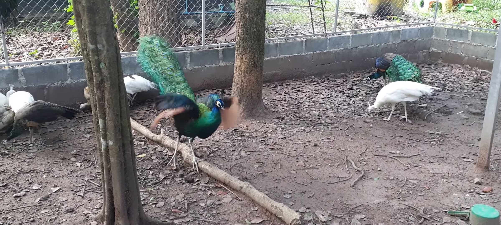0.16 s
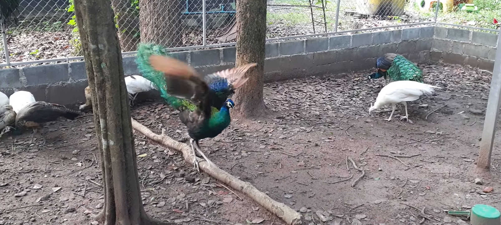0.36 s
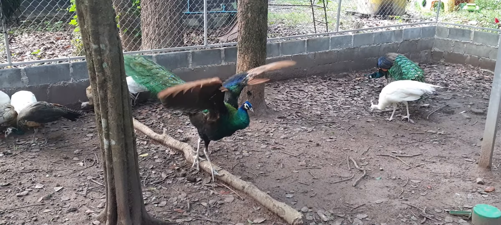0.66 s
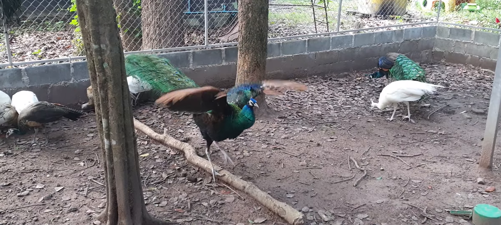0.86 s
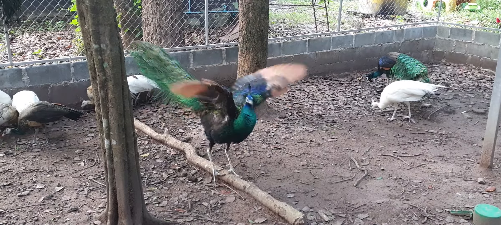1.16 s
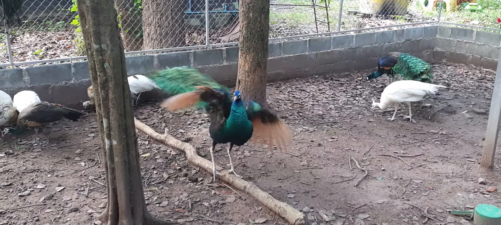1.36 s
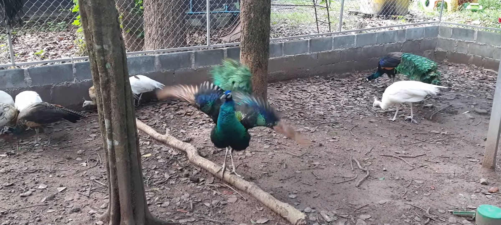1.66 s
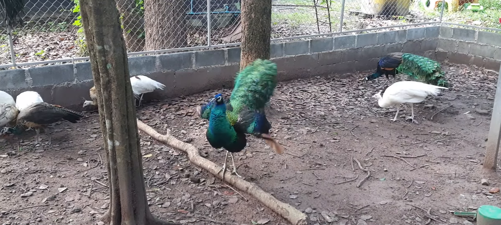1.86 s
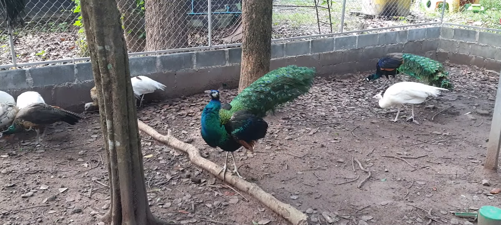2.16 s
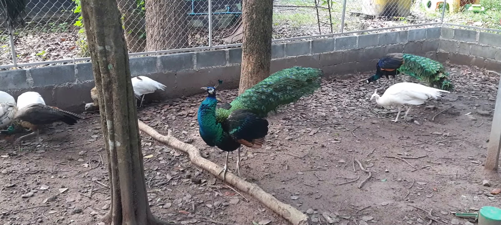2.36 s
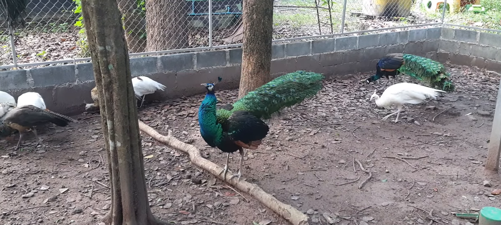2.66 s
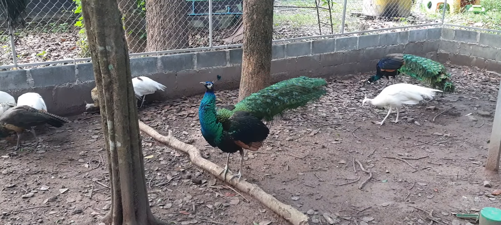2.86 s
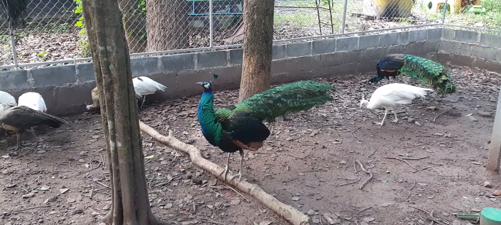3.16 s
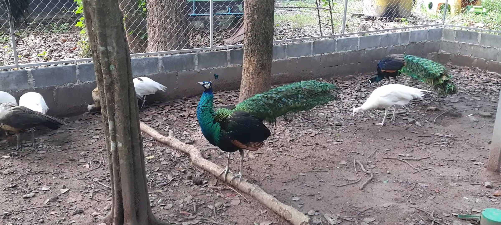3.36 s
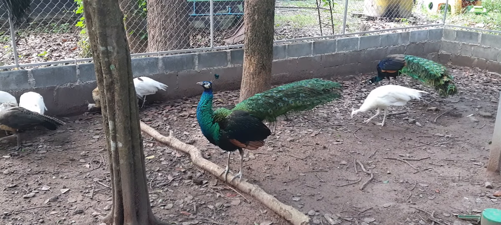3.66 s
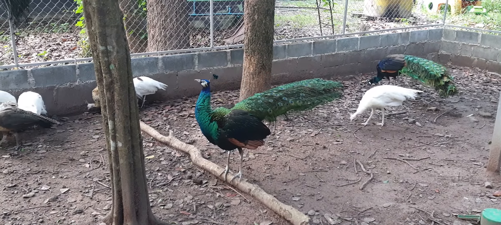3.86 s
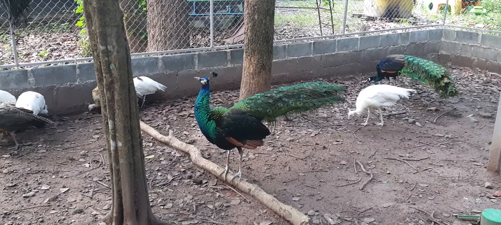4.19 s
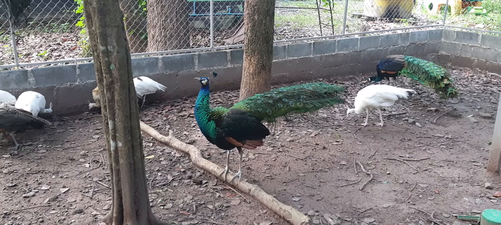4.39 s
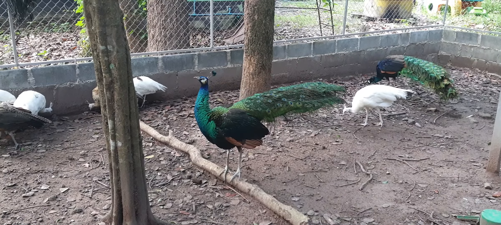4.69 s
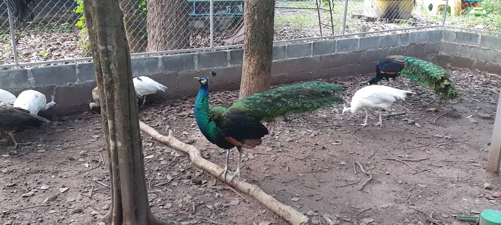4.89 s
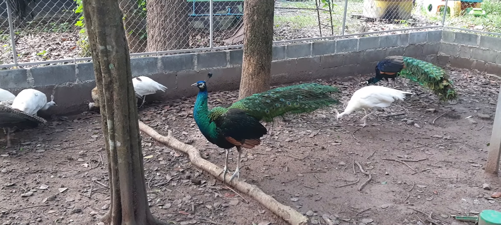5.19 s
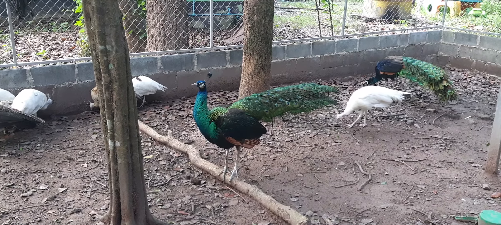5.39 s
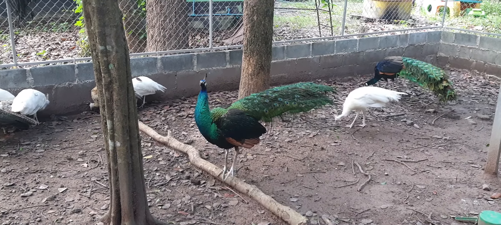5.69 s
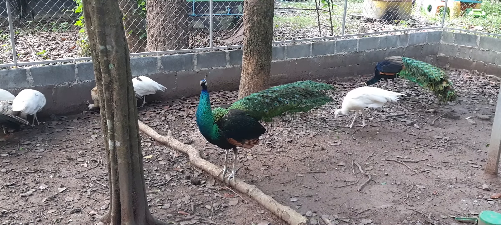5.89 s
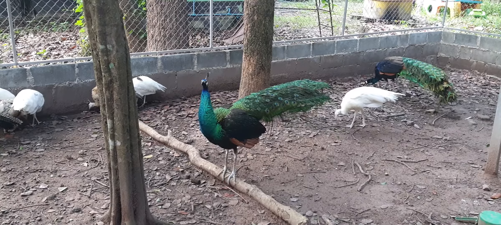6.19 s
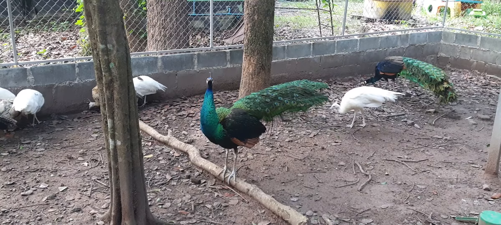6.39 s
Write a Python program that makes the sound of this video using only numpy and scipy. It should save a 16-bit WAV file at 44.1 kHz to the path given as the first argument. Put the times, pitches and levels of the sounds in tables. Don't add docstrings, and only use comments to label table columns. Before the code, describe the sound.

First a sharp twig crack, soft wingbeats and a low left-leaning engine that suddenly stops. Then a calmer pen: faint leaf rustle, small snaps, thin whistles, harsh little buzzes ending in chips, distant clucks and crowing, crickets and air hiss over faraway motors. Finally a rough, rising three-part crow erupts nearby, much louder than everything else. Phone pickup, wide outdoor ambience with short scattered echoes.

```python
import sys
import numpy as np
from scipy import signal
from scipy.fft import rfft, irfft, next_fast_len
from scipy.io import wavfile
from scipy.ndimage import uniform_filter1d

SR = 44100
rng = np.random.default_rng(int(sys.argv[2]) if len(sys.argv) > 2 else 0)


def linear_from_db(decibels):
    return 10 ** (np.asarray(decibels, float) / 20)


def bounce(signal):
    frames = np.transpose(np.atleast_2d(signal))
    limited = np.clip(frames, -1, 1)
    pcm = np.round(limited * 32767).astype(np.int16)
    wavfile.write(sys.argv[1], SR, pcm)


N = 288414
PORT_GAP = 13


def evened(x):
    return x / np.sqrt(np.mean(x ** 2) + 1e-20)


def read(points, hz):
    f, value = np.transpose(points)
    return np.interp(np.log(hz + 1), np.log(f + 1), value)


def curves(rows):
    s, *columns = np.transpose(rows)
    t = np.arange(s[0], s[-1], 1 / SR)
    return s[0], [np.interp(t, s, column) for column in columns]


def whole(rows):
    s, *columns = np.transpose(rows)
    return [np.interp(np.arange(N) / SR, s, column) for column in columns]


def add(mix, s, sound):
    part = mix[..., max(round(s * SR), 0):][..., :sound.shape[-1]]
    part += sound[..., :part.shape[-1]]


def wander(count, hz):
    smoother = np.poly([np.exp(-2 * np.pi * hz / SR)] * 2)
    return evened(signal.lfilter([1], smoother, rng.standard_normal(count + 8000))[8000:])


def colour(x, points):
    size = next_fast_len(x.shape[-1] + 2048)
    gain = linear_from_db(read(points, np.fft.rfftfreq(size, 1 / SR)))
    return irfft(rfft(x, size) * gain, size)[..., :x.shape[-1]]


def sine(hz):
    return np.sin(2 * np.pi * np.cumsum(hz) / SR)


def fuzzy(hz, width):
    turn = 2 * np.pi * np.cumsum(hz) / SR
    return evened(wander(len(hz), width / 2) * np.cos(turn) + wander(len(hz), width / 2) * np.sin(turn))


def wash(points, patchy_db, size):
    # pitch_hz, likeness (0-1)
    likeness = [(60, 0.94), (200, 0.86), (500, 0.72), (1500, 0.082), (4000, 0.028), (15000, 0.041)]
    frames, hz = 4 * N // size + 5, np.fft.rfftfreq(size, 1 / SR)
    a, b, c, d, patches = rng.standard_normal((frames, len(hz), 5)).T
    patches = evened(uniform_filter1d(uniform_filter1d(patches, size=12, axis=0), size=10, axis=1))
    same = np.clip(read(likeness, hz), 0, 1)[:, None]
    right = a + 1j * b
    early = np.exp(2j * np.pi * hz * PORT_GAP / SR)[:, None]
    left = same * right * early + np.sqrt(1 - same ** 2) * (c + 1j * d)
    z = np.array([left, right]) * linear_from_db(read(points, hz)[:, None] + patchy_db * patches)
    return evened(signal.istft(z, nperseg=size, noverlap=3 * size // 4)[1][:, :N])


def pen(x, wet_db, t60):
    count = SR // 3
    taps = np.zeros((2, count))
    at = np.arange(200, count - 20, 20) + rng.integers(0, 20, (2, (count - 201) // 20))
    np.put_along_axis(taps, at, rng.choice([-1., 1.], at.shape), 1)
    taps *= linear_from_db(-60 * np.arange(count) / SR / t60)
    taps *= linear_from_db(wet_db) / np.linalg.norm(taps[0])
    taps[[0, 1], [0, PORT_GAP]] = 1
    return signal.oaconvolve(x * np.ones((2, 1)), taps, axes=1)[:, :N] / np.hypot(1, linear_from_db(wet_db))


def swells(rows):
    t, power = np.arange(N) / SR, 0
    for s, db, rise, fall in rows:
        power = power + linear_from_db(db - 20 * np.maximum((s - t) / rise, (t - s) / fall)) ** 2
    return np.sqrt(power)


def surges(rows, dip_db):
    s = np.transpose(rows)[0]
    hz, db = whole(rows)
    place = np.interp(np.arange(N) / SR, s, np.arange(len(s)))
    return hz, db - dip_db * np.sin(np.pi * place) ** 2


def crow():
    # time_s, effort_db, pitch_hz
    syllables = [
        [(5.845, -62, 808), (5.88, -47.5, 770.3), (5.93, -40.5, 769.6), (6.0, -45.5, 775.4), (6.05, -50, 775.6),
         (6.1, -56, 795.5), (6.17, -54, 759)],
        [(6.155, -68, 790.5), (6.195, -45.5, 853.5), (6.225, -36.5, 873), (6.26, -38, 873.3), (6.3, -37, 886.6),
         (6.34, -40, 890), (6.4, -41.5, 880)],
        [(6.39, -46, 850), (6.43, -38, 843), (6.465, -34, 866), (6.5, -39.5, 840), (6.54, -32, 840)],
    ]
    # centre_hz, width_hz, level_db
    beaks = [
        [(610, 105, -11), (1133, 245, -1), (1424, 186, 3.5), (1890, 99, -5), (2330, 200, -10.5),
         (2720, 280, -8.5), (3180, 127, -12), (4200, 160, -16)],
        [(685, 130, -35), (840, 400, -3.5), (1120, 233, -10), (1440, 390, 2), (1750, 160, 4.5),
         (2140, 220, 6.5), (2700, 90, -4), (2840, 230, -5), (3080, 270, -16), (3630, 170, -4),
         (4760, 320, -12.5)],
        [(691, 61, -10), (840, 340, -3.5), (1120, 153, -6), (1520, 330, 1.5), (1690, 160, 4), (2070, 210, 4),
         (2250, 170, -6), (2740, 190, -8), (2900, 190, -1), (3100, 150, -8), (4760, 470, -14)],
    ]
    # pitch_hz, level_db
    throat = [(400, -31), (560, -35), (1500, -10.5), (3200, -18.5), (3600, -13.5), (6000, -28), (9000, -42),
              (15000, -60)]
    # second_membrane_hz, hoarseness at start and at end (0-1), chest_start_db, chest_settled_db
    membranes = [
        (680, .4, .62, -21, 4),
        (685, .22, .5, -5, -1),
        (688, .48, .6, 2, 1),
    ]
    out, grid = np.zeros(N), np.arange(300, 16000, 10.)
    for rows, beak, (second_hz, fresh, tired, early_db, late_db) in zip(syllables, beaks, membranes):
        s, (effort_db, hz) = curves(rows)
        count = len(hz)
        t = np.arange(count) / SR
        hoarse = np.clip(np.linspace(fresh, tired, count), 0, 1)
        chest_db = late_db + (early_db - late_db) * np.exp(-(t / .08) ** 2)
        first = 2 * np.pi * np.cumsum(hz * (1 + .024 * wander(count, 45))) / SR
        second = 2 * np.pi * np.cumsum(second_hz * (1 + .027 * wander(count, 58.5))) / SR
        harmonics = sum(np.cos(k * first) for k in range(1, 14))
        pulses = harmonics * (1 + 1.05 * np.cos(second)) + 1.32 * np.cos(second)
        breath = (1 + np.cos(first)) * rng.standard_normal(count)
        drive = (1 - hoarse) * evened(pulses) + hoarse * evened(breath)
        drive = drive * linear_from_db(3.0 * wander(count, 55))

        def through_beak(opening):
            gain = linear_from_db(read(throat, grid))
            for f, width, db in beak:
                gain = gain + linear_from_db(db) / (1 + abs(2 * (grid - opening * f) / width) ** 3)
            return colour(drive, np.c_[grid, 20 * np.log10(gain)])

        shut, ajar = through_beak(.94), through_beak(1)
        closing = np.clip(np.exp(-(t / .04) ** 2) + .3 * (wander(count, 12) - .6), 0, 1)
        voice = np.sqrt(closing) * shut + np.sqrt(1 - closing) * ajar
        chest = colour(voice, [(950, 0), (1050, -60)])
        add(out, s, linear_from_db(effort_db) * evened(voice + (linear_from_db(chest_db) - 1) * chest))
    return linear_from_db(7.0) * pen(out, wet_db=-4, t60=0.33)


def scold():
    # start_s, length_s, buzz_db, upper_resonance_db
    buzzes = [
        (0, 0.12, -61, -67),
        (0.327, 0.23, -58.5, -88),
        (1.417, 0.37, -59, -59),
        (2.799, 0.21, -62, -96),
        (4.335, .19, -61.5, -102),
        (5.163, 0.42, -58, -55),
    ]
    # start_s, peak_db, pitch_hz
    chips = [(.365, -49, 3430), (0.418, -42.5, 3240), (1.66, -42.5, 3280), (2.83, -46, 3420),
             (2.885, -42, 3320), (4.367, -50, 3327), (4.419, -43.5, 3300), (5.389, -42.5, 3277)]
    out = np.zeros(N)
    for s, length, buzz_db, upper_db in buzzes:
        t = np.arange(0, length, 1 / SR)
        flat = np.ones(len(t))
        rise_db = -10 * np.maximum(1 - t / .034, 0)
        low_db = buzz_db + rise_db - 9.5 * (t / length) ** 2
        high_db = upper_db + rise_db - 9.5 * np.maximum(1 - t / .15, 0)
        high_db = high_db - 102 * np.maximum(t - .091, 0)
        buzz = 1 + .6 * np.cos(2 * np.pi * np.cumsum(180 * (1 + .1 * wander(len(t), 30))) / SR)
        sag = 5080 - 650 * (t / length) ** 2
        low = fuzzy(sag, 550) + 0.91 * fuzzy(sag + 450 - 1400 * t / length, 1400)
        high = fuzzy(7150 * flat, 720) + 1.6 * fuzzy(6500 * flat, 700)
        bands = linear_from_db(low_db) * low + linear_from_db(high_db) * high
        add(out, s, bands * buzz * signal.windows.tukey(len(t), .15))
    u = np.linspace(0, 1, round(0.0332 * SR))
    for s, db, hz in chips:
        chip = sine(hz * (1 + .16 * (1 - u) ** 2)) + .7 * fuzzy(1.12 * hz + 0 * u, 700)
        add(out, s, linear_from_db(db - 6.0) * chip * np.sin(np.pi * u))
    return linear_from_db(3) * pen(out, wet_db=-4, t60=.15)


def whistles():
    # time_s, level_db, pitch_hz
    songs = [
        [(1.31, -71, 2300), (1.36, -75, 2250), (1.402, -70, 2350), (1.43, -65.5, 2260), (1.46, -66.5, 2080),
         (1.528, -63, 1925), (1.575, -61, 1852), (1.6, -59, 1863), (1.614, -78, 1875), (1.635, -58, 1867),
         (1.7, -77, 1980)],
        [(3.57, -78, 2720), (3.62, -72, 2870), (3.75, -71.5, 3020), (3.83, -71, 2960), (3.92, -75, 2913)],
        [(4.04, -75, 2860), (4.09, -83, 2360), (4.15, -65.5, 2136), (4.2, -71, 2082), (4.34, -72.5, 1840)],
        [(3.6, -80, 3790), (3.66, -63, 3920), (3.74, -68, 3800)],
        [(1.285, -72, 2080), (1.3, -64, 1845), (1.32, -66, 1750), (1.345, -72, 1710)],
    ]
    purity = [1.1, .7, .5, .6, .9]
    # start_s, first_pitch_hz, level_db, left_minus_right_db
    cheeps = [(3.9, 3420, -70, -6), (3.91, 2010, -74, -2), (4.034, 2900, -73, -6), (3.96, 2032, -71, -9),
              (4.268, 2194, -69, -1), (4.373, 2114, -66.5, -15), (4.426, 2300, -65.5, -17),
              (4.698, 2630, -71.5, -6), (4.78, 2463, -65.5, -6)]
    # start_s, length_s, first_pitch_hz, level_db, left_minus_right_db
    level_notes = [(0, 0.2, 2650, -76, -2), (0.597, 0.03, 3010, -74, -5), (2.628, 0.1, 3264, -75, -11),
                   (3.171, .08, 2250, -76.5, -1), (4.049, .07, 7710, -81, -1),
                   (1.156, 0.12, 2630, -68.5, 8), (1.233, .1, 2940, -70.5, 0),
                   (3.992, 0.057, 3257, -68.5, -4), (4.201, 0.066, 1365, -71, -8),
                   (4.706, 0.22, 2450, -68.5, 8), (4.718, 0.033, 1830, -67, 2), (4.969, 0.12, 780, -75, -4),
                   (4.98, 0.36, 2200, -73.5, -3), (5.123, 0.15, 2480, -74, 0), (5.164, 0.052, 2290, -66, 3),
                   (3.59, 0.31, 1750, -78.5, 6), (3.68, 0.16, 2610, -81, -6)]
    out = np.zeros((2, N))

    def tone(hz, clean, width):
        return clean * sine(hz) + (1 - .7 * clean) * fuzzy(hz, width)

    calls = [(s, .035, hz, db, pan_db, .84, .95) for s, hz, db, pan_db in cheeps]
    calls += [tuple(row) + (.93, .6) for row in level_notes]
    for s, length, first_hz, db, pan_db, fall, clean in calls:
        hz = first_hz * np.linspace(1, fall, round(length * SR))
        ports = linear_from_db([[db + pan_db], [db]])
        add(out, s, ports * tone(hz, clean, 230) * signal.windows.tukey(len(hz), .5))
    for rows, clean in zip(songs, purity):
        s, (db, hz) = curves(rows)
        add(out, s, linear_from_db([db, db]) * tone(hz, clean, 200) * signal.windows.tukey(len(hz), .1))
    return linear_from_db(9.0) * pen(out, wet_db=-7, t60=.19)


def rustle():
    # peak_s, level_db, rise_s, fall_s (times for 20 dB)
    stirs = [(.15, -51.5, 0.0043, 0.027), (.165, -61, 0.049, 0.17), (.22, -68, .05, 0.12),
             (.27, -75, 0.23, 0.85), (.66, -69.5, 1, 0.34), (1.18, -68.5, 0.25, 1),
             (1.62, -63.5, 0.16, 0.34), (1.82, -72.5, 0.55, 0.18), (3.1, -70, 0.1, 0.21),
             (4.7, -75, 0.41, 0.32), (4.83, -63, 0.066, 0.16), (5.26, -68, 0.22, 0.14),
             (5.52, -73.5, 0.061, 0.12), (5.96, -65.5, 0.28, 0.3), (6.2, -68, .06, 0.74),
             (6.54, -61, 0.15, 0.077)]
    # pitch_hz, level_db (per Hz)
    leaf_tint = [(2500, -2.5), (4000, 6.5), (5500, 3.5), (7500, -2.5), (9300, -5), (10300, -12.5),
                 (11500, -7), (13000, -2.5), (15500, -8)]
    # peak_s, level_db, rise_s, fall_s (times for 20 dB)
    flaps = [
        (0, -76, 0.39, 3.7),
        (1.25, -68.5, 0.2, 1.25),
        (1.6, -68, 0.96, 0.26),
        (3.0, -81, 1, 1.4),
        (3.9, -71, 0.16, 1.94),
        (5.0, -68.5, 0.95, 1.51),
    ]
    clicks = linear_from_db(0.7 * np.minimum(rng.exponential(1, N), 5))
    crackle = clicks * (rng.random(N) < 900 / SR) * rng.choice([-1, 1], N)
    grains = evened(colour(pen(crackle, wet_db=49.0, t60=0.022), leaf_tint))
    litter = evened(wash(leaf_tint, patchy_db=3.0, size=256) + 0.7 * grains)
    leaves = linear_from_db(11.5) * np.hypot(swells(stirs), linear_from_db(-84)) * litter
    feather_tint = [(700, -32), (1500, -2.5), (2300, -2.5), (3200, -6.0), (3450, 5.0), (6000, -47)]
    return leaves + linear_from_db(7.0) * swells(flaps) * wash(feather_tint, patchy_db=3.0, size=512)


def wingbeats():
    # start_s, length_s, level_db
    puffs = [
        (0.139, 0.076, -59.5),
        (0.259, 0.11, -73),
        (0.429, 0.21, -60.5),
        (0.618, 0.19, -70),
    ]
    out = np.zeros(N)
    for s, length, db in puffs:
        noise = rng.standard_normal(round(length * SR))
        puff = colour(noise, [(150, -39), (230, 1), (400, -1.5), (650, -41), (1200, -46)])
        add(out, s, linear_from_db(db) * evened(puff) * np.hanning(len(puff)))
    return out


def snaps():
    # start_s, peak_db, knock_db
    twig = [
        (.143, -40, -44),
        (.1457, -28, -32),
        (.1488, -29, -34),
    ]
    # start_s, peak_db, knock_db
    pecks = [(0.5037, -49.5, -52), (0.967, -45.5, -105), (1.062, -54, -80), (1.1172, -47, -49.5),
             (1.429, -50, -53), (1.5873, -54, -61), (2.18, -63, -56), (2.83, -61, -55), (3.102, -65, -50.5),
             (3.9058, -77, -49.5), (3.9463, -62, -52), (4.039, -60, -52), (4.814, -45, -52),
             (4.9785, -52.5, -86), (5.5103, -54, -62)]
    out, t = np.zeros(N), np.arange(round(.1 * SR)) / SR
    shape = (np.exp(-t / 0.00086) + 0.029 * np.exp(-t / 0.055)) * (1 - np.exp(-t / 0.00045))
    for s, db, low_db in list(twig) + list(pecks):
        crack, knock = rng.standard_normal((2, len(t))) * shape
        crack = colour(crack, [(3000, -10.0), (5000, -4.5), (7500, 0.5), (10500, -7.0), (13000, 0.5), (16000, -3.0)])
        knock = colour(knock, [(200, 5.0), (1000, -34.0), (2600, 12.5), (3200, 13.5), (3800, -9.0)])
        add(out, s, linear_from_db(db + 9) * crack / abs(crack).max())
        add(out, s, linear_from_db(low_db + 3.0) * knock / abs(knock).max())
    return pen(out, wet_db=-1, t60=.2)


def far_calls():
    # start_s, length_s, level_db, drift_db, first_pitch_hz, last_pitch_hz
    cocks = [(.79, .75, -72.5, 4, 1670, 1560), (1.5, .6, -71.5, 0.5, 1520, 1410),
             (2.06, .6, -70.5, -4.5, 1430, 1560), (.8, .5, -72.5, -4, 2130, 1940),
             (1.62, .9, -79, 5, 1900, 1830), (1.7, .8, -80, -3.5, 1160, 1110)]
    # start_s, length_s, level_db, drift_db, first_pitch_hz, last_pitch_hz
    goose = [
        (.9, 0.59, -69.5, -4.5, 795, 785),
        (1.38, 0.412, -65, -14, 785, 750),
        (1.27, 0.513, -69, -6, 660, 680),
    ]
    # start_s, length_s, level_db, pitch_hz
    hen = [(0, 0.075, -61, 1102), (0.117, 0.19, -62, 1098), (0.325, 0.17, -76.5, 1046),
           (2.643, 0.11, -59, 1144), (2.774, 0.094, -64.5, 1053), (2.864, 0.1076, -64.5, 1082),
           (2.997, 0.14, -61.5, 1121), (3.149, 0.053, -67.5, 1117), (3.221, 0.096, -78.5, 1153)]
    out = np.zeros(N)
    clucks = [(s, length, db, -4.5, hz, hz - 75.2) for s, length, db, hz in hen]
    lows = [(s - .018, length, db - 6, -6, 890, 890) for s, length, db, hz in hen]
    # rows, ratio of second line, its share, width in Hz, edge, pure tone, throb
    kinds = [(cocks, .93, .7, 110, .15, .25, 0), (goose, .9, .9, 70, .35, .3, 0),
             (clucks, 1.04, .4, 55, .2, 1.7, .6), (lows, 1.07, .6, 50, .2, .7, .6)]
    for rows, ratio, share, width, edge, clean, throb in kinds:
        for s, length, db, drift_db, first_hz, last_hz in rows:
            u = np.linspace(0, 1, round(length * SR))
            hz = first_hz + (last_hz - first_hz) * u ** .7
            pair = clean * sine(hz) + fuzzy(hz, width) + share * fuzzy(ratio * hz, 3.5 * width)
            pair = pair * (1 - throb * np.cos(2 * np.pi * 29 * length * u))
            add(out, s, linear_from_db(db + drift_db * u) * evened(pair) * signal.windows.tukey(len(u), edge))
    return linear_from_db(6.0) * pen(out, wet_db=-2, t60=.3)


def crickets():
    # first_s, last_s, level_db
    bouts = [(.03, .04, -63), (.2, .4, -65), (.55, .75, -61.5), (.91, 1.5, -67), (1.73, 2.35, -62.5),
             (2.44, 3.1, -68.5), (3.15, 4.7, -62), (5.45, 6.45, -64.5)]
    out, t = np.zeros(N), np.arange(round(.095 * SR)) / SR
    for first_s, last_s, db in bouts:
        for s in np.arange(first_s, last_s, .1785):
            trill = .85 * np.sin(2 * np.pi * 4850 * t) + .7 * fuzzy(4845 + 0 * t, 90)
            trill = trill * (1 + .45 * np.cos(2 * np.pi * 135 * t))
            add(out, s, linear_from_db(db) * trill * signal.windows.tukey(len(t), .4))
    swell_db = 2 * wander(N, 4)
    chorus = np.array([linear_from_db(-73.5 + swell_db) * fuzzy(np.full(N, 5950.), 450) +
                       linear_from_db(-89.0 - swell_db / 2) * fuzzy(np.full(N, 4400.), 380) for port in range(2)])
    return pen(out, wet_db=-5, t60=.14) + colour(chorus, [(3900, -30), (4150, 0)])


def stalling_engine():
    # time_s, firing_hz, level_db
    firing = [(-.06, 79, -25), (.06, 79.6, -42.5), (.195, 81.3, -42), (.335, 81.6, -39.5), (.43, 80, -38.5),
              (.562, 79, -40), (.648, 77.8, -42.5), (.735, 82, -43.5), (.85, 78.5, -40)]
    hz, db = surges(firing, dip_db=5)
    db = db - 452 * np.maximum(np.arange(N) / SR - .745, 0)
    engine = sine(hz) + .1 * sine(hz / 2) + .046 * sine(hz * 3 / 2)
    engine = np.sqrt(2) * engine + .2 * fuzzy(hz, 20)
    return linear_from_db([db + 8.0, db + 0.34]) * engine


def distant_engines():
    # time_s, firing_hz, level_db
    steady = [(.8, 64, -72), (1.44, 58.5, -63.5), (1.55, 58.6, -50), (2.19, 58.5, -62), (2.93, 58.6, -51),
              (3.16, 61.8, -60), (4.6, 58.5, -50), (6.54, 58.8, -50)]
    # time_s, firing_hz, level_db
    surging = [(.8, 85.6, -92), (1.25, 90, -62), (1.53, 89.6, -55), (1.97, 86.44, -53.5),
               (2.33, 86.5, -56.5), (2.72, 87.8, -51), (3.1, 94.5, -53.5), (3.39, 93.2, -55),
               (3.62, 92.3, -52.5), (3.9, 90, -62), (4.22, 90.2, -48), (4.55, 87.6, -47.5),
               (5.0, 86.2, -47.5), (5.62, 87.7, -52), (6.45, 88.7, -50.5), (7, 88.3, -25)]
    # pitch_hz, level_db
    orders = [(44, -98), (111, -63), (134, -61), (156, -66), (245, -80.5)]
    # time_s, level_db
    rumble = [(0, -58), (.54, -53.5), (.95, -69), (1.62, -63.5), (1.97, -65), (3.92, -63.5), (4.81, -59),
              (5.26, -54.5), (5.61, -63.5), (6.54, -58)]
    # pitch_hz, level_db (per Hz)
    roar_tint = [(18, -39), (32, -30), (45, -5.5), (83, -1), (114, -5), (165, -17), (210, -27), (400, -73)]
    # pitch_hz, level_db (per Hz)
    hiss_tint = [(120, -8), (190, 0), (300, 7), (450, -13), (700, -21), (1000, -23.5)]
    drone_hz, drone_db = whole(steady)
    truck_hz, truck_db = surges(surging, dip_db=11.5)
    [roar_db] = whole(rumble)
    drone = linear_from_db(drone_db + 3.0) * (np.sqrt(2) * sine(drone_hz) + 0.06 * fuzzy(drone_hz, 9.2))
    truck = linear_from_db(truck_db + 3.0) * (np.sqrt(2) * sine(truck_hz) + 0.13 * fuzzy(truck_hz, 2.9))
    pump = np.zeros(N)
    for hz, db in orders:
        pump += linear_from_db(db + 57.5 + 3.3 * wander(N, 1.66)) * np.sqrt(2) * sine(np.full(N, hz))
    roar = linear_from_db(roar_db) * (pump + linear_from_db(7.0) * wash(roar_tint, patchy_db=3.5, size=4096))
    hiss = linear_from_db(roar_db - 9.5) * wash(hiss_tint, patchy_db=2.5, size=2048)
    return roar + drone + truck + hiss


def open_air():
    # pitch_hz, level_db (per Hz)
    air_tint = [(180, -45), (300, -6.5), (742, -11), (1190, -12.5), (1360, -31), (2790, -11.5), (3590, -5),
                (4100, -2.5), (4770, -1), (5280, -9.5), (6030, -3), (7260, -23), (9490, -21.5),
                (10700, -52), (15200, -43), (16500, -27)]
    return linear_from_db(-68 + 4.5) * wash(air_tint, patchy_db=3.5, size=1024)


def scene():
    birds = crow() + scold() + whistles() + far_calls()
    litter = rustle() + wingbeats() + snaps()
    return birds + litter + crickets() + stalling_engine() + distant_engines() + open_air()


def low_pass(x):
    return signal.sosfilt(signal.butter(12, 16880, fs=SR, output="sos"), x)


def record(dry):
    # pitch_hz, level_db
    left_shade = [(60, -9), (380, -4.5), (700, -5), (1290, -6.5), (2380, -15.5), (4400, -6.5), (8100, -5.5),
                  (15000, -7.5)]
    ports = np.array([colour(dry[0], left_shade), dry[1]])
    ports = colour(ports, [(3250, 0), (3450, -12), (4000, -12), (4250, 0)])
    ports = colour(ports, [(15780, 0), (15840, -70)])
    return low_pass(ports)


dry = scene()
out = record(dry)
bounce(out)
```